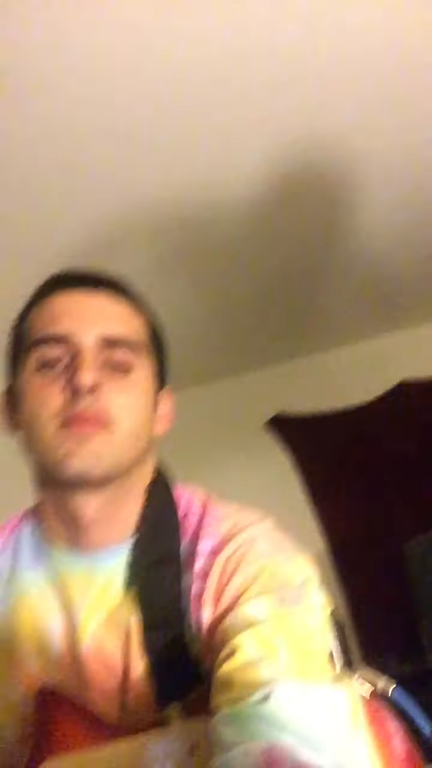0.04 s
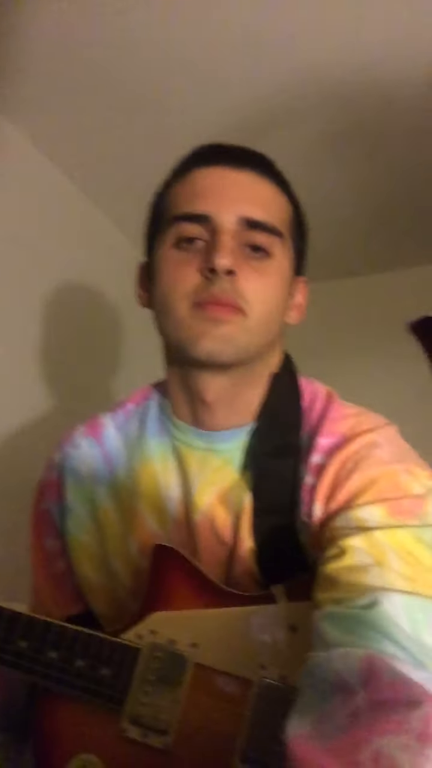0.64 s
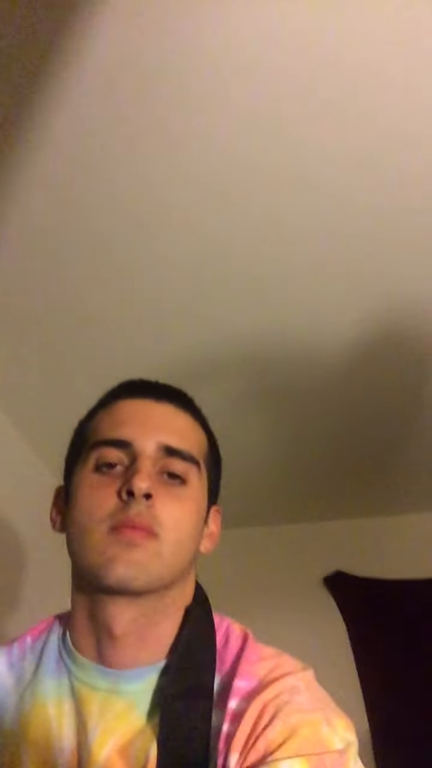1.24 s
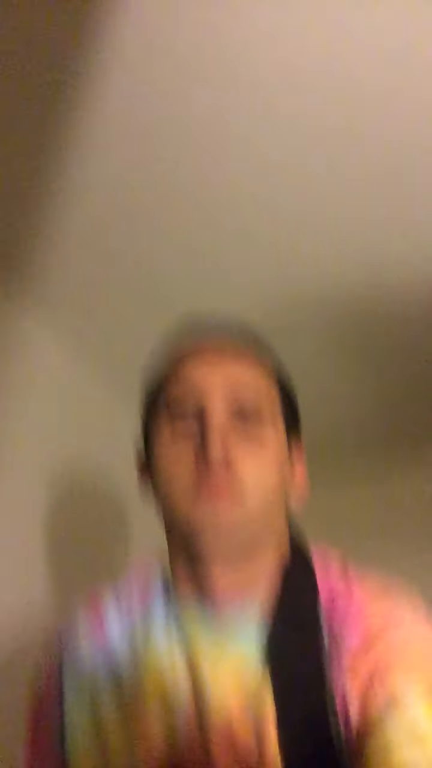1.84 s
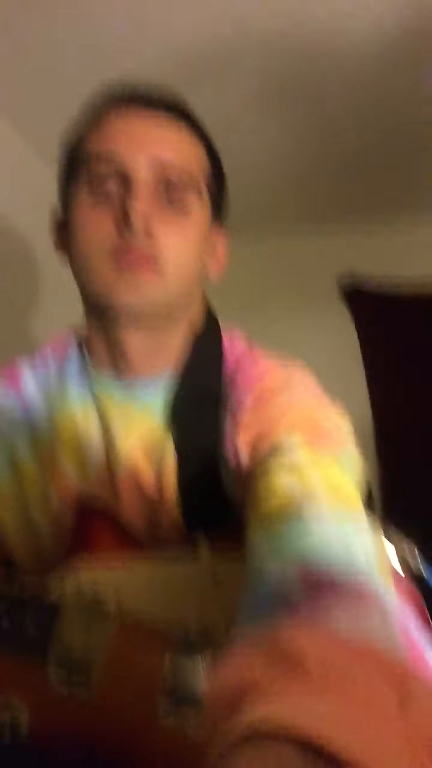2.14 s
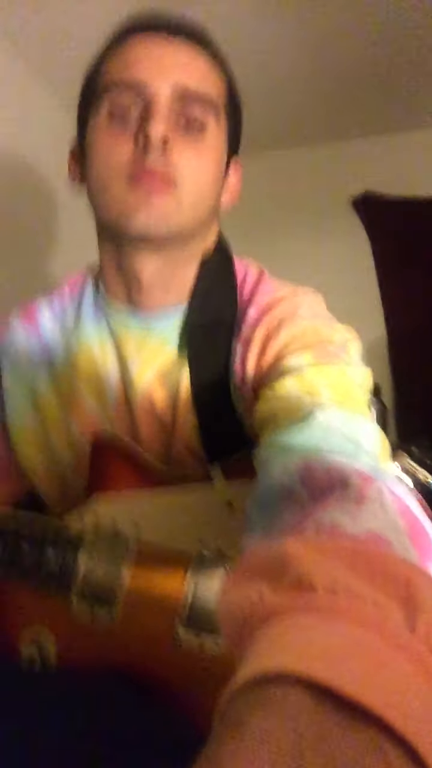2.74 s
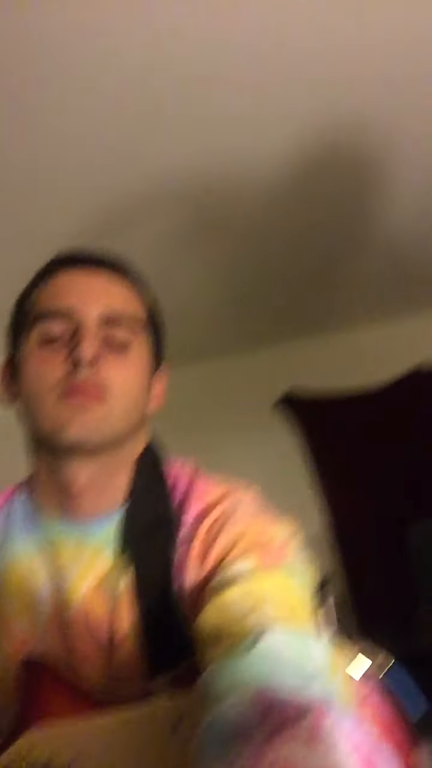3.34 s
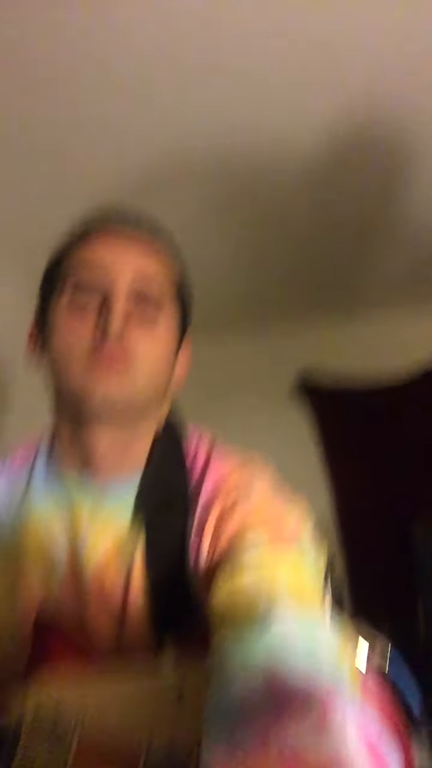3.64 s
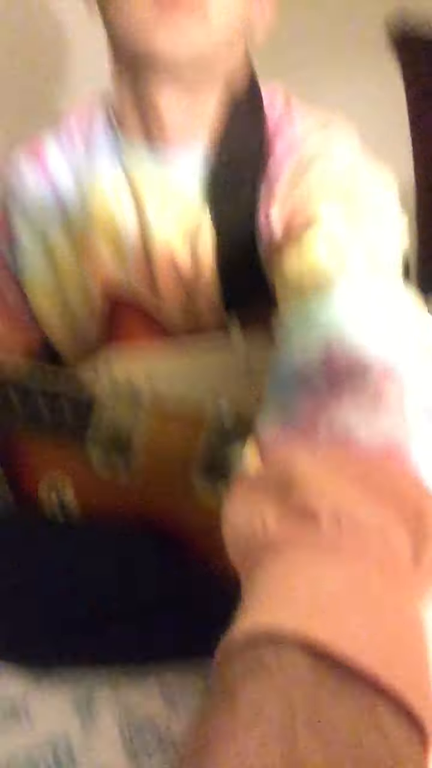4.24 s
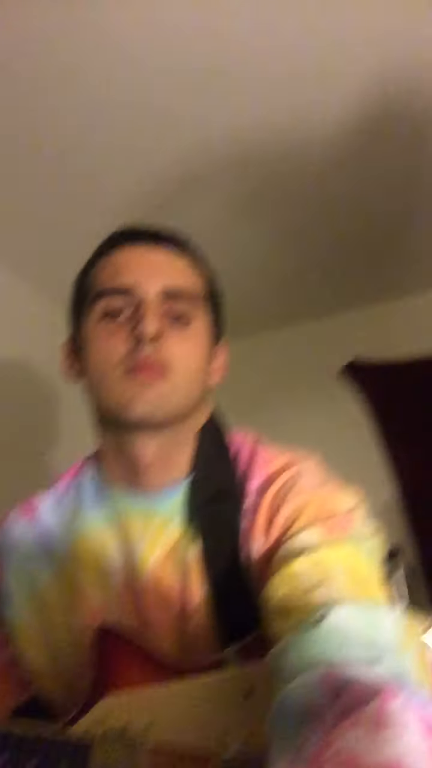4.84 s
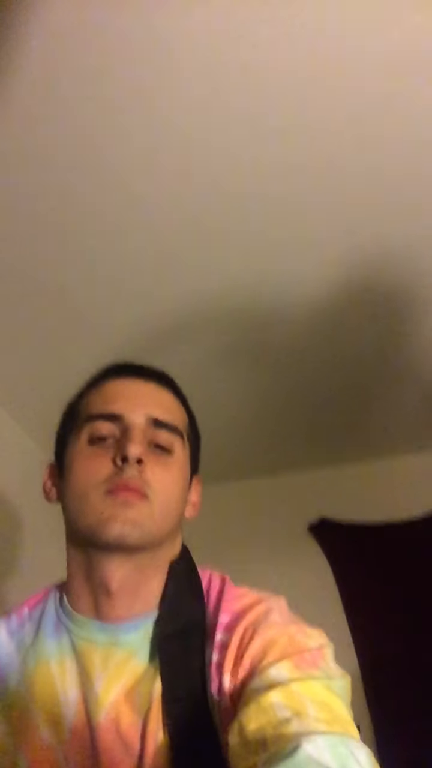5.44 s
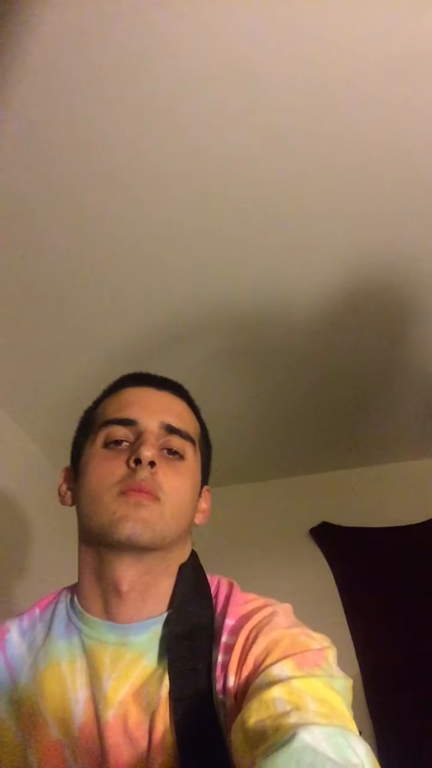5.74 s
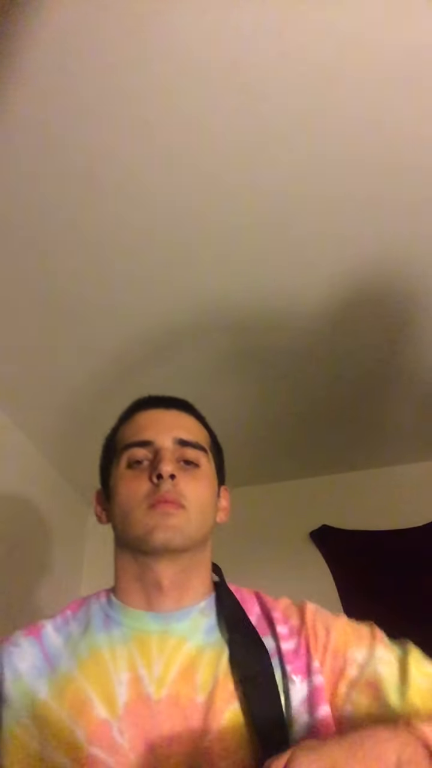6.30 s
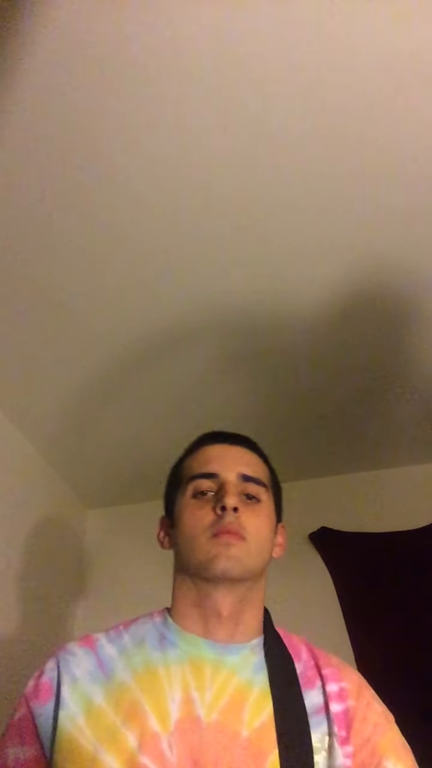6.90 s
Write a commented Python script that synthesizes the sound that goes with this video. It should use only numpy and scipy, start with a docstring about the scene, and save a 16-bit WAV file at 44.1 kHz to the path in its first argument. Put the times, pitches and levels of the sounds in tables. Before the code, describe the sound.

Close, uneven handling noise as fingers and a sleeve slide across a phone, bumping it softly, then easing into faint grazes.

```python
"""A hand or sleeve slides over the case of a phone carried at arm's length in a quiet room.
Each stroke is a rush of tiny slips that ring the case and the microphone port, with a low purr
from the ridged surface. Light brushing, soft bumps of the grip and a few sharp ticks fall in
and between the strokes; three short grazes and a faint rustle of cloth come last."""
import sys
import numpy as np
from scipy import signal
from scipy.fft import rfft, irfft, next_fast_len
from scipy.io import wavfile

SR = 44100
rng = np.random.default_rng(int(sys.argv[2]) if len(sys.argv) > 2 else 0)


def wav_record(signal):
    """Record a signal, one row per channel, as 16-bit PCM in the file named by sys.argv[1]."""
    frames = np.transpose(np.atleast_2d(signal))
    bounded = np.clip(frames, -1, 1)
    # unit amplitude maps onto the largest positive 16-bit level
    quanta = np.round(bounded * 32767).astype(np.int16)
    wavfile.write(sys.argv[1], SR, quanta)


N = 307211
TIME = np.arange(N) / SR


def from_db(db):
    return 10 ** (np.asarray(db) / 20)


def rms_one(x):
    return x / np.sqrt(np.mean(x ** 2) + 1e-20)


def drift(rate_hz):
    """A smooth random wander with spread 1, mostly slower than rate_hz."""
    step = 20
    pole = np.exp(-2 * np.pi * rate_hz * step / SR)
    noise = rng.standard_normal(N // step + 2002)
    wander = signal.lfilter([1], [1, -2 * pole, pole * pole], noise)[2000:]
    return np.interp(np.arange(N) / step, np.arange(len(wander)), rms_one(wander))


def band(x, hz, kind, order=2):
    """Butterworth filter."""
    return signal.sosfilt(signal.butter(order, hz, kind, fs=SR, output="sos"), x)


def coloured(x, curve):
    """Shape a steady signal with an EQ curve that rolls off below its first point; rms 1."""
    hz, db = np.transpose(curve)
    size = next_fast_len(N)
    bin_hz = np.maximum(np.arange(size // 2 + 1) * SR / size, 1)
    gain = from_db(np.interp(np.log(bin_hz), np.log(hz), db))
    roll_off = np.minimum(bin_hz / hz[0], 1) ** 2
    return rms_one(irfft(rfft(x, size) * gain * roll_off, size)[:N])


def resonance(x, hz, width_hz):
    """Two-pole band-pass with gain 1 at its peak."""
    r = np.exp(-np.pi * width_hz / SR)
    feedback = [1, -2 * r * np.cos(2 * np.pi * hz / SR), r * r]
    return signal.lfilter(np.array([1, 0, -1]) * (1 - r * r) / 2, feedback, x)


def burst(start_s, t60_s, length_s=.25):
    """An envelope with an instant attack and an exponential decay."""
    envelope, start = np.zeros(N), int(start_s * SR)
    age = TIME[:min(int(length_s * SR), N - start)]
    envelope[start:start + len(age)] = from_db(-60 * age / t60_s)
    return envelope


def ring(start_s, hz, t60_s):
    """A struck sine that dies away."""
    age = TIME - int(start_s * SR) / SR
    return np.sin(2 * np.pi * hz * age) * burst(start_s, t60_s, length_s=.5)


def slips(per_s, spread_db, smooth):
    """Friction: tiny slips of uneven size at random moments, over a smooth hiss."""
    sizes = from_db(spread_db * np.clip(rng.standard_normal(N), -2, 2)) * rng.choice([-1, 1], N)
    slipping = rng.random(N) < per_s / SR
    return rms_one(sizes * slipping) + smooth * rng.standard_normal(N)


def case(x, wet=1):
    """Case and microphone port ring, lifting their own resonances."""
    # resonances of case and port: pitch_hz, width_hz, lift_db
    modes = [(609, 38, 9.5), (1092, 28, 8.5), (1267, 38, 3), (1880, 120, 5.5), (2025, 110, 2.5),
             (2850, 830, 3), (3240, 260, 6), (3830, 130, 5), (4200, 480, 4.5), (5274, 310, 9),
             (8700, 1100, 1.5), (11180, 510, 6.5)]
    return x + wet * sum((from_db(db) - 1) * resonance(x, hz, width_hz) for hz, width_hz, db in modes)


def cupped(rub, low_hz, high_hz):
    """The hand cups the port: passing resonances in this range turn the rub hollow at an even level."""
    # hollows under the hand: centre_s, half_length_s, pitch_hz, width_hz, over_plain_rub_db
    hollows = [ (0.032, 0.055, 607, 201, 6), (.69, 0.047, 1645, 397, -2.5), (0.692, 0.024, 2780, 405, -6),
               (1.645, 0.028, 622, 260, 7), (1.98, .11, 3224, 299.8, 1), (1.98, .11, 3980, 500, 1.5),
               (2.031, 0.032, 930, 130, 3.5), (2.03, 0.062, 365.5, 130, -2.5),
               (2.062, 0.037, 790, 120, 0.5), (2.247, 0.093, 346, 90, 2), (2.299, .075, 507, 240, 1.5),
               (2.304, 0.055, 1530, 600, 5), (2.31, .07, 4216, 452, 1.5), (4.322, 0.031, 387, 170, 5.5),
               (4.41, 0.036, 440, 299, -4), (4.73, .057, 2680, 448.4, -11.5), (6.705, .03, 615, 150, -1.5),
               ]
    power = np.ones(N)
    for centre_s, half_length_s, hz, width_hz, db in hollows:
        if low_hz < hz < high_hz:
            swell = from_db(db) * np.exp(-((TIME - centre_s) / half_length_s) ** 2 / 2)
            hollow = resonance(resonance(rng.standard_normal(N), hz, width_hz), hz, width_hz * 2)
            rub = rub + swell * rms_one(hollow)
            power += swell ** 2
    return rub / np.sqrt(power)


def slide(start_s, rise_s, fall_s, peak_db, swell_db, touch_s=.03, lift_s=.036):
    """One slide speeds up and slows to rest, louder with speed: its samples, speed (0-1) and gain."""
    end_s = start_s + rise_s + fall_s
    span = (TIME > start_s) & (TIME < end_s)
    t = TIME[span]
    speed = np.sin(np.pi / 2 * np.interp(t, [start_s, start_s + rise_s, end_s], [0, 1, 0]))
    contact = (np.minimum((t - start_s) / touch_s, 1) * np.minimum((end_s - t) / lift_s, 1)) ** 1.46
    return span, speed, contact * from_db(peak_db - swell_db * (1 - speed))


def room_tone(level_db=-58.5):
    """A steady bed of low room rumble and faint hiss."""
    # colour of the room: frequency_hz, gain_db
    room_eq = [(36, -8.5), (55, -7.5), (84, -13.5), (119, -4), (145, -22), (188, -23.5), (300, -27),
               (500, -33.5), (1000, -35), (3460, -44), (5000, -43.5), (6420, -44), (7300, -47),
               (15600, -52)]
    return from_db(level_db) * coloured(rng.standard_normal(N), room_eq)


def distant_sleeve():
    """A sleeve moves further off, its cloth slipping in a faint rustle."""
    # fade of the rustle: time_s, level_db
    fade = [(6.4, -76.5), (6.74, -75.5), (6.966, -70)]
    # colour of the cloth: frequency_hz, gain_db
    cloth_eq = [(500, -8), (1500, -6), (3000, -7), (4300, -2), (5100, -10), (8650, -9), (15600, -19.5)]
    time_s, level_db = np.transpose(fade)
    rustle = coloured(slips(per_s=2200, spread_db=1, smooth=.47), cloth_eq)
    return np.interp(TIME, time_s, from_db(level_db), left=0) * rustle


def finger_nudges(count=16, from_s=.05, to_s=4.8, level_db=-33, pitch_hz=76, t60_s=.023):
    """The fingers resettle every so often, each time with a faint low thud."""
    starts = np.interp(np.arange(count) + rng.random(count), [0, count], [from_s, to_s])
    thuds = np.zeros(N)
    for start_s, (force, detune) in zip(starts, rng.standard_normal((count, 2))):
        thuds += from_db(level_db + 2.5 * force) * ring(start_s, pitch_hz * np.exp(.2 * detune), t60_s)
    return band(thuds + 1e-18, 400, "low")


def ticks(t60_s=.014):
    """Something hard is touched and rattles high and briefly, each time favouring other modes."""
    # small sharp touches: start_s, level_db, brightness_hz
    touches = [(.064, -39, 11000), (1.612, -31, 5000), (1.648, -32, 4500), (2.211, -21, 6500),
               (4.278, -45, 9000), (4.297, -33.5, 8500)]
    # what a tick rings with: pitch_hz, width_hz, weight_db
    modes = [(4100, 600, -2), (5100, 600, -0.5), (6700, 610, 7.5), (7000, 600, -3.5), (9300, 1500, -0.5),
             (13500, 2900, 1)]
    mode_hz, _, weight_db = np.transpose(modes)
    rattles = np.array([rms_one(resonance(rng.standard_normal(N), hz, width)) for hz, width, _ in modes])
    out = np.zeros(N)
    for start_s, level_db, brightness_hz in touches:
        blend = from_db(weight_db) * np.exp(-np.log2(mode_hz / brightness_hz) ** 2)
        blend /= np.linalg.norm(blend)
        out += from_db(level_db) * burst(start_s, t60_s) * (blend @ rattles)
    return out


def grip_bumps(overtone_ratio=3.7, overtone_db=-9, scuff_t60_s=.11, scuff_makeup_db=10):
    """Soft flesh meets the case: a heavily damped thud and a short, dull scuff."""
    # firm bumps of the grip: start_s, thud_db, pitch_hz, t60_s, scuff_db (ahead of filter and makeup)
    bumps = [ (0.892, -20, 110.9, 0.041, -36), (1.369, -29, 91.5, 0.041, -52),
             (1.609, -18, 165, 0.033, -19.5), (1.641, -16.5, 176.6, 0.054, -14),
             (1.646, -9, 548, 0.048, -30), (2.215, -19.5, 116.2, 0.072, -24),
             (2.335, -25.5, 95.04, 0.1, -19.5), (2.43, -29, 150, 0.11, -40), (2.523, -27, 115, .07, -37),
             (2.595, -20, 80, .06, -48), (2.86, -25, 68.4, 0.068, -41), (3.111, -24, 64.94, 0.068, -46),
             (3.176, -25, 100, .06, -53), (3.634, -26, 220, .053, -40.5), (4.109, -16.5, 176, 0.017, -36),
             (4.25, -9.5, 90.3, 0.023, -34), (4.336, -24, 132, .076, -52), (4.4, -16, 69.6, 0.069, -31),
             (5.159, -33, 402, .053, -40), ]
    thuds, scuff_gain = np.zeros((2, N))
    for start_s, thud_db, pitch_hz, t60_s, scuff_db in bumps:
        overtone = from_db(overtone_db) * ring(start_s, pitch_hz * overtone_ratio, t60_s / 2)
        thuds += from_db(thud_db) * (ring(start_s, pitch_hz, t60_s) + overtone)
        scuff_gain += from_db(scuff_db) * burst(start_s, scuff_t60_s)
    skids = scuff_gain * rng.standard_normal(N)
    scuffs = case(band(skids + 1e-18, [350, 1300], "band", order=3))
    return band(thuds + 1e-18, 700, "low") + from_db(scuff_makeup_db) * scuffs


def grip_rumble(level_db=-9):
    """The pressing hand shakes the whole phone a little."""
    return from_db(level_db) * rms_one(band(rng.standard_normal(N), [85, 190], "band"))


def port_hiss():
    """Hard contact right at the port makes a fine, very bright hiss."""
    # colour of the scrape: frequency_hz, gain_db
    scrape_eq = [(4500, -6.5), (6500, 4), (8500, 1), (10000, -1), (13000, -3.5), (16000, -9)]
    hiss = coloured(slips(per_s=4000, spread_db=1.5, smooth=.66), scrape_eq)
    return rms_one(case(hiss, wet=.6))


def brushing(trim_db=1, flutter_db=1.66):
    """Light contact gives a duller, finer friction, with a trace of hiss from the port."""
    # light passes: start_s, rise_s, fall_s, peak_db (ahead of the trim), swell_db, hiss_re_peak_db
    brushes = [ (0.06, 0.12, 0.14, -44, 13, -21.5), (0.586, 0.13, 0.066, -33.5, 20, -42),
               (1.36, 0.095, .07, -47, 7, -45), (2.975, 0.15, .25, -31.5, 19.5, -45),
               (3.561, .085, 0.069, -43, 14, -45), (3.99, 0.13, 0.29, -41, 15, -26),
               (4.22, .12, .06, -39.5, 5, -45), (4.531, 0.3, 0.054, -36.5, 14.5, -45),
               (4.98, .03, .2, -62.5, 6, -44), ]
    # colour of light friction: frequency_hz, gain_db
    brush_eq = [(110, -1), (220, -3), (400, -3.5), (520, -5.5), (1000, -7), (1400, -11), (2200, -11.5),
                (2900, -19.5), (3500, -22.5), (5500, -30), (7000, -38), (11000, -39.5), (16000, -49.5)]
    power, hiss_power = np.zeros((2, N))
    for *motion, hiss_db in brushes:
        span, _, gain = slide(*motion)
        power[span] += gain ** 2
        hiss_power[span] += (gain * from_db(hiss_db)) ** 2
    friction = slips(per_s=2800, spread_db=-1.5, smooth=.51) * from_db(flutter_db * drift(36))
    brush = rms_one(case(coloured(friction, brush_eq), wet=.53))
    return from_db(trim_db) * np.sqrt(power) * cupped(brush, 0, SR) + np.sqrt(hiss_power) * port_hiss()


def hand_motion(rasp_swell_db=5.5, purr_swell_db=1.8, hiss_swell_db=-2, rest_rate_share=.25):
    """Hand speed drives four layer gains; the stroke that purrs most sets ridge rate and unevenness."""
    # strokes over the case: start_s, rise_s, fall_s, peak_db, swell_db (rest to top speed),
    # rasp_db, purr_db, hiss_db (all three relative to the peak), top_ridge_hz, unevenness (0-1)
    strokes = [ (-0.04, .055, 0.087, -21, 7, -4.5, -11, -46, 234, 0.3),
               (0.25, 0.121, 0.0746, -26.5, 19, -8.5, -9.5, -25, 198, 0.37),
               (0.403, .1, .095, -24, 11, -4, -7, -23.5, 231.1, 0.13),
               (0.717, 0.059, .1, -27, 2.3, -8.5, -18.5, -32, 219.4, .3),
               (0.75, 0.15, 0.54, -26, 9, -2.5, -13, -29, 220, 0.28),
               (0.932, 0.091, 0.13, -24.5, 13, -1, -4.5, -35, 275, 0.023),
               (1.44, .04, .195, -32, 5, -3, -8, -23.5, 200, 0.29),
               (1.591, 0.13, 0.13, -30, 8, -3, -6.5, -21.5, 200, 0.41),
               (1.8, .24, .088, -17, 22, -2.5, -13.5, -23, 201.6, .35),
               (2.07, .07, .12, -29.5, 3, -3.5, -6.5, -31, 180.2, .3),
               (2.16, .112, 0.17, -13.5, 14, -12, -13, -24.5, 225, .3),
               (2.428, .092, .215, -22.5, 20, -7.5, -6, -24.5, 185, 0.24),
               (2.712, 0.21, .088, -23.5, 8, -3, -8, -37, 215, 0.29),
               (3.265, .075, 0.26, -24, 13, -7, -14, -29.5, 245, 0.2),
               (3.668, .125, .195, -20, 11.4, -1.5, -9.5, -24.5, 260.8, .2),
               (4.337, 0.071, .068, -21, 22, -4.5, -9.5, -22, 220, .3),
               (4.408, .084, .07, -21.7, 8, -5, -6.5, -36, 240, 0.29),
               (4.811, .053, 0.16, -26, 10.5, -6, -13.5, -51, 200, 0.36),
               (5.176, .15, .28, -23.5, 7, -5, -10, -50, 236.1, .3),
               (5.855, .02, .053, -37.5, 3, -12.5, -7, -34, 222, .34),
               (6.329, 0.025, 0.03, -45.5, 16, -9.5, 5, -38, 203.7, .3),
               (6.652, .042, 0.046, -36.5, 18, -14, -10, -31, 240, 0.29), ]
    power = np.zeros((4, N))
    ridge_hz, unevenness = np.zeros((2, N))
    for *motion, rasp_db, purr_db, hiss_db, top_ridge_hz, uneven in strokes:
        span, speed, body = slide(*motion)
        slack = 1 - speed
        # rasp and purr swell more with speed than the body does, the hiss less
        rasp = body * from_db(rasp_db - rasp_swell_db * slack)
        purr = body * from_db(purr_db - purr_swell_db * slack)
        hiss = body * from_db(hiss_db - hiss_swell_db * slack)
        leads = purr ** 2 > power[2, span]
        stroke_hz = top_ridge_hz * (speed + rest_rate_share * slack)
        ridge_hz[span] = np.where(leads, stroke_hz, ridge_hz[span])
        unevenness[span] = np.where(leads, uneven, unevenness[span])
        power[:, span] += np.square([body, rasp, purr, hiss])
    return np.sqrt(power), ridge_hz, unevenness


def hand_strokes(grab=.13, crossover_hz=2600, rasp_trim_db=-.36, body_trim_db=.17, purr_trim_db=2.1):
    """The sliding hand catches once per ridge: this shakes the case into a purr and bunches the slips."""
    # colour of firm friction: frequency_hz, gain_db
    rub_eq = [(300, -1.5), (400, -9.5), (520, -7), (750, -1.5), (950, -6), (1450, -7), (2100, -5.5),
              (2550, -10.5), (4200, -10), (4750, -20.5), (6500, -30), (9500, -36), (13000, -41),
              (16000, -54)]
    (body_gain, rasp_gain, purr_gain, hiss_gain), ridge_hz, unevenness = hand_motion()
    catch_hz = ridge_hz * np.exp(unevenness * drift(129.06))
    ridges = np.sin(2 * np.pi * np.cumsum(catch_hz) / SR)
    pressure = (1 + grab * ridges) * from_db(.5 * drift(64) + 1.25 * drift(48))
    # fine slips make the bright rasp, coarse ones the body of the rub
    fine = case(coloured(slips(per_s=7600, spread_db=.5, smooth=.4) * pressure, rub_eq))
    coarse = case(coloured(slips(per_s=5000, spread_db=3, smooth=.58) * pressure, rub_eq))
    rasp = cupped(rms_one(band(fine, crossover_hz, "high", order=5)), crossover_hz, SR)
    body = cupped(rms_one(band(coarse, crossover_hz, "low", order=5)), 0, crossover_hz)
    purr = rms_one(ridges * from_db(3 * drift(51)))
    return (from_db(rasp_trim_db) * rasp_gain * rasp
            + from_db(body_trim_db) * body_gain * body
            + from_db(purr_trim_db) * purr_gain * purr
            + hiss_gain * port_hiss()
            + purr_gain * grip_rumble())


def scene():
    """A mono mix: strokes up front, small contacts around them, the room behind."""
    handling = hand_strokes() + brushing() + grip_bumps() + finger_nudges() + ticks()
    return (handling + distant_sleeve() + room_tone())[None]


def record(dry, bass_cut_hz=41, top_cut_hz=15800, ceiling=.75):
    """The microphone rounds the highest peaks and drops the deep bass; the top is cut."""
    rounded = ceiling * np.tanh(dry / ceiling)
    thinned = band(rounded, bass_cut_hz, "high", order=5)
    return signal.sosfilt(signal.ellip(12, .1, 80, top_cut_hz, fs=SR, output="sos"), thinned)


dry = scene()
out = record(dry)
wav_record(out)
```